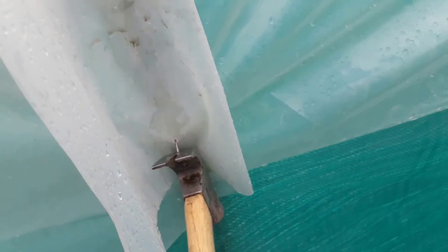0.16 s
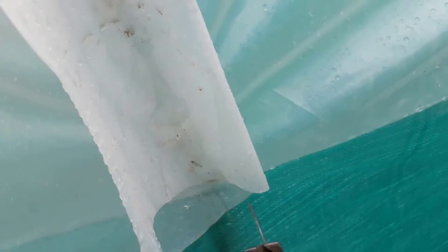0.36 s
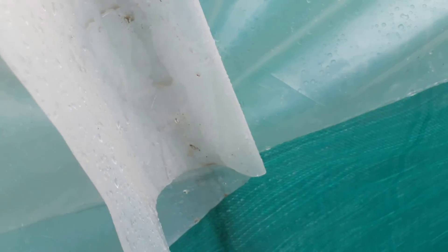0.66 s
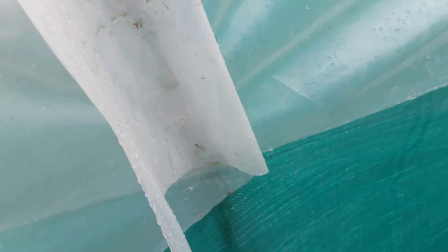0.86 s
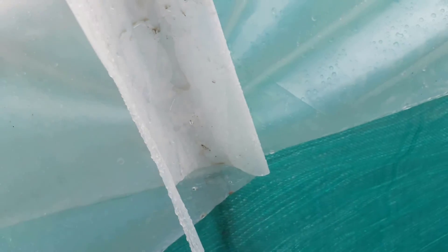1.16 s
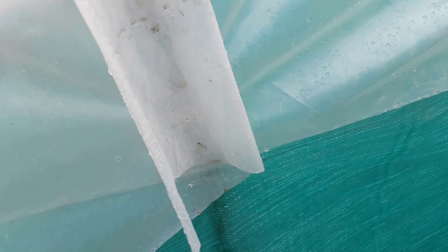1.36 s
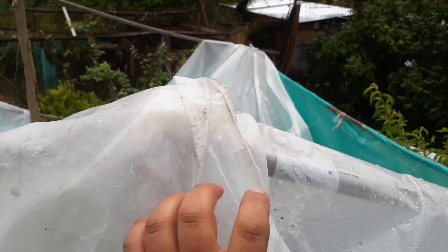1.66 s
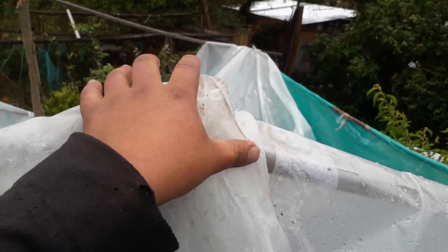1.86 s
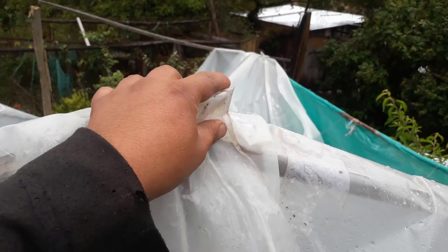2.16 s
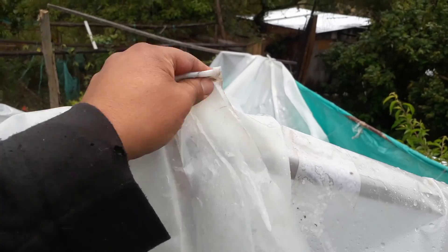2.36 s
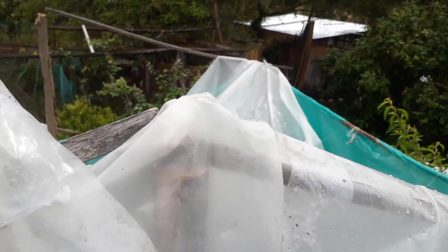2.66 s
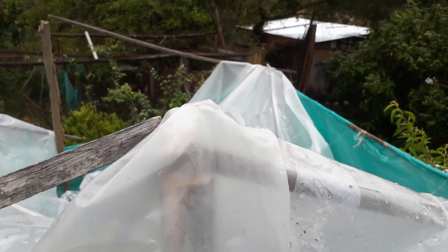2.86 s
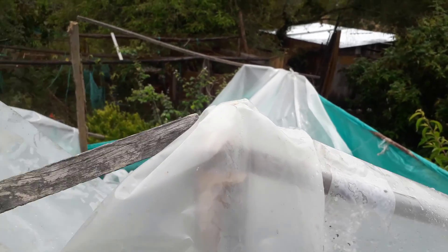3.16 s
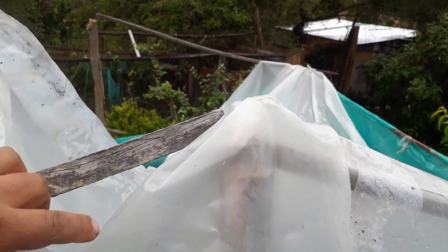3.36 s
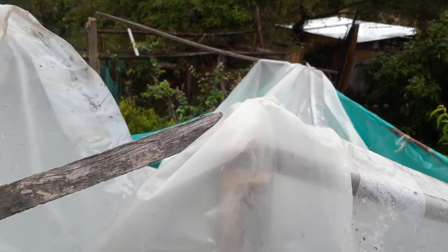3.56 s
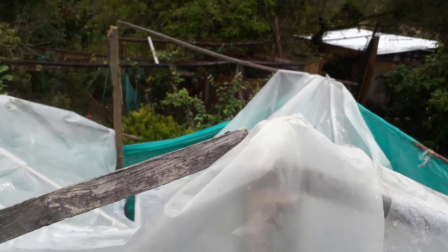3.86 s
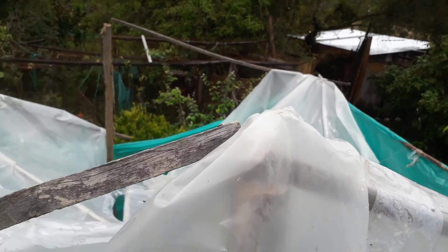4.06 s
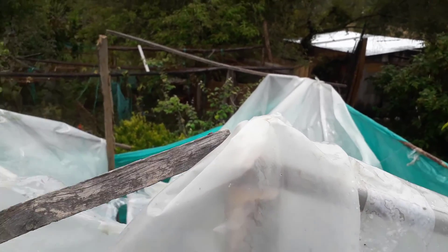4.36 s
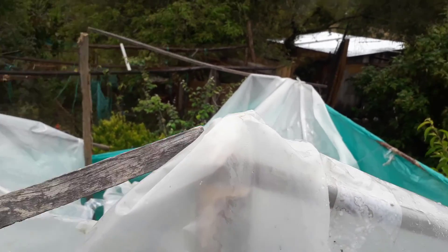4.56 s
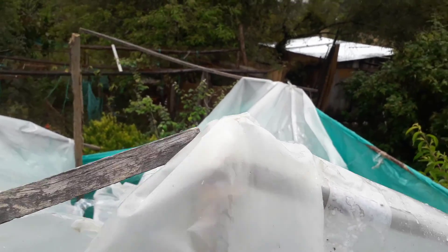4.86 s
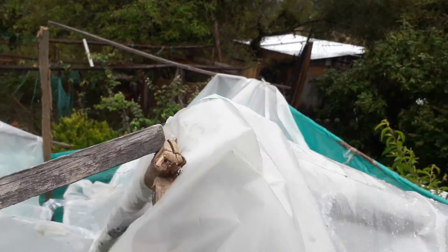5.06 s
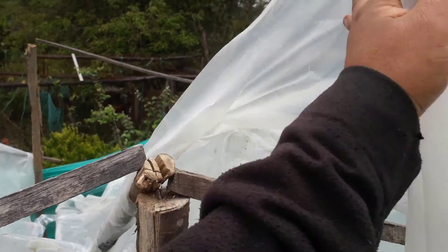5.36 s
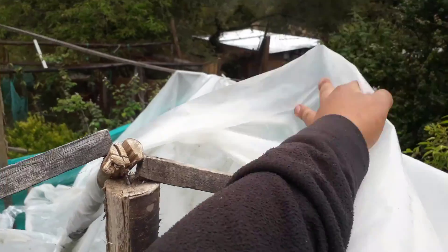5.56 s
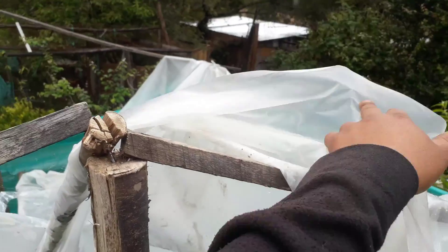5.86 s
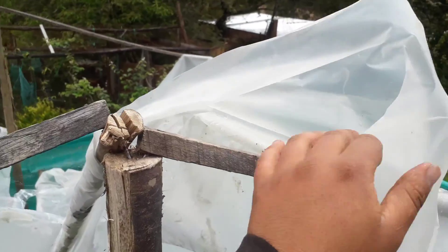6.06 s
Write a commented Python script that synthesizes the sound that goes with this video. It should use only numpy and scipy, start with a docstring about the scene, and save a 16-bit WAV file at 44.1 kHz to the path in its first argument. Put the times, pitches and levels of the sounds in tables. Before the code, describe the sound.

Close, dry crinkling and hard snapping of thin plastic film pulled by hand outdoors, after a brief rustle and a quiet pause with small birds.

```python
"""A soft rustle over a low distant hum and near birdsong, then plastic snaps hard as a hand pulls a sheet.
The thin film goes over a garden frame, close to a phone, in two shots split by a short near-silent gap.
Creases are bursts of film-coloured noise ringing a patch; crinkle, slide and flap are dense random crackle.
Birds are gliding sines, some smeared by a noise echo of the trees; the garden is filtered noise and faint tones.
"""
import sys
import numpy as np
from scipy import signal
from scipy.fft import rfft, irfft
from scipy.io import wavfile
from scipy.ndimage import uniform_filter1d

SR = 44100
rng = np.random.default_rng(int(sys.argv[2]) if len(sys.argv) > 2 else 0)


def to_wav(s):
    """Save 16-bit WAV."""
    ch = np.atleast_2d(s).T  # columns
    pcm = np.round(np.clip(ch, -1, 1) * 32767)  # PCM
    wavfile.write(sys.argv[1], SR, pcm.astype(np.int16))


N = 272979

# Loud creases snapping; fall is held to at least 0.2 ms:
# (time [s], ring peak [dB], ring pitch [Hz], fall [ms], crack peak [dB re ring peak])
SNAPS = [(.3071, -5.5, 1270, 0.27, -36), (.323, -6, 1270, 0.35, -7), (.3848, -20.5, 1550, 1.1, -23),
         (.4302, -23, 1500, .6, -24), (.4558, -26.5, 1440, 1.3, -6.5), (.6384, -33, 1250, 2.9, -23),
         (1.6335, -28, 5000, 2.4, 8.5), (1.6546, -4, 1730, 1.5, -6.5), (1.6731, -15, 4000, 0.73, -9),
         (1.681, -10, 1590, 2.4, -11), (1.6902, -15.5, 970, 2.3, -29), (1.959, -20, 920, 4.2, -22),
         (1.968, 0, 1820, 0.55, -13.5), (2.009, -25, 1640, 0.42, -30), (2.129, -1.5, 1156, .74, -9.5),
         (2.256, -19.5, 2190, 0.7, -19), (2.2827, -12, 2140, 0.7, -3.5), (2.33, -20.5, 1030, 1.3, -19),
         (2.646, -15.5, 2300, 1, -8), (2.709, -25, 1560, 4.1, -21), (2.7354, -15, 1240, 0.7, -25),
         (2.7577, -5, 1600, .48, -18), (2.7653, -6, 1660, 0.79, -23), (2.768, -11, 1480, 5.8, -11.5),
         (2.7857, -13, 1550, 8.1, -26), (2.8269, -6.5, 1660, 0.81, -10.5), (2.833, -7.5, 1580, 3, -12),
         (2.8414, -7.5, 1620, 1, -34), (2.883, -19, 1600, 3.5, -22), (2.891, -4.5, 1900, 0.98, -7.5),
         (2.9115, -10.5, 1820, 2.1, -16), (2.9199, -13, 1750, 0.8, -30), (2.9655, -17, 1730, 1.3, -8),
         (2.9837, -9, 1720, 0.27, -13), (3.059, -16.5, 1580, 1.2, -29), (3.1585, -14, 1790, 1, -20),
         (3.213, -15, 1670, 1.2, -9), (3.328, -19.5, 1830, 12, -13), (3.3467, -1, 1520, 1, -17),
         (3.3612, -2.5, 2570, 2.5, -8), (3.389, -4.5, 2240, 0.79, -6.5), (3.4534, -10, 1790, 1.1, 2.5),
         (3.553, -16, 1350, 1.1, -24), (3.5748, -6.5, 2450, 1.9, -8.5), (3.6217, -13, 1830, 0.85, -31),
         (3.6486, -6.5, 2050, 0.87, -22), (3.6927, -13.5, 1790, .91, -17), (3.7266, -12, 1830, 1.8, -18),
         (3.7323, -14.5, 1410, 4, -29), (3.7536, -14.5, 1550, 0.34, 2.5), (3.7888, -12, 796, 37, -12),
         (3.7947, -8.5, 1540, 8.2, -29), (3.821, -14, 1560, 11, -20), (3.8507, -13.5, 1740, .72, -13),
         (3.9186, -30, 1590, 1.4, -27), (3.932, -12.5, 2530, 2.1, -4.5), (3.959, -21, 1720, 4.1, -19),
         (3.9902, -7, 1010, 0.26, -23), (4.1329, -12, 1660, .43, -17), (4.208, -20, 1460, 4.1, -20),
         (4.2758, -20, 1580, 5, -25), (4.313, -25, 1920, .95, -28), (4.358, -9.5, 1640, 4, -34),
         (4.3957, -7, 1800, 1.1, -30), (4.403, -7, 825, 2.9, -0.5), (4.422, -4, 1760, 1.9, -16),
         (4.4496, -2.5, 2090, 0.17, -21), (4.479, -6, 1880, 0.6, -10), (4.486, -11, 1810, 10, -12.5),
         (4.5181, -12.5, 890, 12, -20), (4.5545, -15, 2680, 1.5, -23), (4.5881, -6, 1860, 1.9, -11.5),
         (4.7044, -24.5, 1600, 2.7, -34), (4.8487, -30, 1590, 1.3, -33), (4.885, -16.5, 1720, 4.1, -25),
         (4.9046, -10, 1870, 2, -21), (4.9158, -2, 1900, 0.45, -12.5), (4.973, -11.5, 2000, 1.2, -27),
         (4.9982, -18, 1450, .95, -31), (5.0097, -16.5, 1890, 4.3, -30), (5.0285, -13.5, 1530, 0.73, -27),
         (5.0488, -3, 1780, 0.38, -15.5), (5.062, -12.5, 2160, 1.6, -18), (5.1017, -17.5, 2020, 1.9, -26),
         (5.1315, -16.5, 1610, .82, -13), (5.1627, -3.5, 2140, 1.7, -8.5), (5.2084, -10.5, 2280, 0.92, -4),
         (5.238, -17.5, 2140, 2.7, -13), (5.2693, -4.5, 3620, 0.81, -5.5), (5.284, -14, 2310, 4.6, -3),
         (5.3451, -9.5, 1830, 3.1, -8), (5.3593, -14, 1060, 1.1, -25), (5.3783, -12, 3160, 1.2, -16),
         (5.4269, -15.5, 1960, 2.9, -5), (5.4889, -17.5, 810, 2.9, -1), (5.521, -16.5, 1730, 0.98, -3.5),
         (5.5742, -13, 1760, 4.8, -15), (5.6258, -13.5, 1230, 1.5, -20), (5.6728, -15.5, 2240, 1.7, -8.5),
         (5.7104, -16, 2250, 1.2, -9), (5.7389, -15.5, 1230, 3.7, -20), (5.7542, -13.5, 1940, 2.5, -7.5),
         (5.7671, -11.5, 2070, 0.57, -12.5), (5.8094, -19, 1400, 0.54, -16), (5.8509, -15, 1430, 2.2, 1.5),
         (5.9194, -24.5, 1360, 1.8, -31), (5.9633, -22.5, 1160, 0.98, -20), (6.0095, -20, 1090, 1.4, -23),
         (6.0147, -20.5, 1130, 2.8, -19), (6.0376, -13.5, 2940, 2.1, -11)]
# Tone of the film as the microphone colours it: (frequency [Hz], level per hertz [dB])
FILM_TONE = [(35, -54), (60, -18.5), (124, -8), (222, -2), (389, -1), (666, -7), (1700, -3), (2520, -5),
             (3270, -7), (4420, -4.5), (6900, -17.5), (9350, -43), (10800, -48.5), (13000, -38),
             (16000, -44.5)]
# Each pull of the hand, as breakpoints joined by straight lines in dB:
# (time [s], crinkle level [dB], slide level [dB], flap level [dB])
PULLS = [
    [(.02, -48, -48.5, -50), (.168, -88, -75, -45.5), (.227, -39, -49, -42), (.317, -58, -37.5, -33),
     (.383, -36, -37.5, -40), (.441, -64, -60, -58), (.499, -69, -71, -59)],
    [(1.63, -55, -42, -36.5), (1.684, -41.5, -40, -25.5), (1.716, -56, -51, -41), (1.824, -58, -55.5, -64),
     (1.96, -24.5, -34, -23), (1.99, -51, -51, -41), (2.033, -55, -54, -43)],
    [(2.065, -33.5, -43, -46), (2.1, -26, -34, -35), (2.129, -37, -38.5, -35), (2.165, -40, -46.5, -52),
     (2.292, -32, -34.5, -57), (2.359, -37.5, -47.5, -41.5), (2.46, -30, -29, -33.5),
     (2.536, -40, -35, -43.5), (2.654, -30, -38.5, -31.5), (2.738, -35, -42.5, -37),
     (2.832, -28.5, -36, -30), (2.897, -25.5, -37, -37), (2.955, -35, -43.5, -40),
     (3.091, -40.5, -57, -46.5)],
    [(3.16, -41.5, -43.5, -47.5), (3.207, -31.5, -37, -37), (3.308, -39.5, -42.5, -42.5),
     (3.36, -31.5, -38, -37.5), (3.554, -35.5, -45.5, -50), (3.753, -24.5, -33, -28),
     (3.849, -28.5, -42.5, -31.5), (3.981, -23.5, -41, -29.5), (4.024, -42.5, -52.5, -49)],
    [(4.2, -31, -48.5, -33.5), (4.236, -42.5, -53, -45.5), (4.384, -33.5, -54, -30.5),
     (4.484, -24, -37.5, -33.5), (4.588, -30.5, -39, -39), (4.655, -39, -50, -54), (4.707, -40, -67, -40),
     (4.85, -57, -57, -60.5)],
    [(4.915, -25, -43, -34.5), (4.991, -44, -48, -40), (5.059, -26, -52, -36), (5.15, -44.5, -48.5, -39),
     (5.256, -41, -59, -44), (5.285, -40, -39, -42), (5.322, -46, -59, -51), (5.35, -34.5, -53, -38),
     (5.406, -41, -46.5, -53)],
    [(5.432, -25.5, -33, -31), (5.511, -38, -47, -31.5), (5.581, -30, -33.5, -40), (5.641, -35.5, -47, -36),
     (5.677, -26.5, -31.5, -41), (5.805, -41.5, -53.5, -55), (5.861, -37, -46, -65), (5.992, -44, -46, -67),
     (6.046, -34, -60, -46.5), (6.072, -47, -51, -59), (6.12, -40.5, -57, -48), (6.18, -54, -68, -70)],
]
# Taut patches of film, each buckling on its own: (centre [Hz], level in the patch mix [dB])
PATCHES = [(900, -5), (1300, -2.8), (1900, 0.7), (2700, -4.5)]
# Slack film slapping: (time [s], peak [dB], pitch [Hz], time to fall 60 dB [s], held to 0.01-0.05 s)
THUMPS = [(0.133, -29.5, 332, 0.0081), (.308, -26, 170, .025), (0.322, -23.5, 167, 0.024),
          (1.963, -29, 110, 0.025), (2.128, -27, 216, 0.027), (4.4, -36, 110, 0.027),
          (5.187, -20, 270, 0.012), (5.518, -24, 304, 0.017)]
# One bird's rising whistle: (time [s], length [s], top pitch [Hz], level [dB])
RISERS = [(0.483, 0.1, 6300, -57), (0.853, 0.14, 5970, -57), (1.276, 0.13, 6250, -56.5)]
# Near birds' notes, most of them sagging: (time [s], length [s], from [Hz], to [Hz], level [dB])
SAGS = [(0.036, .14, 4120, 3550, -54), (.065, 0.095, 4410, 3050, -53), (0.512, .06, 3800, 3320, -63),
        (0.555, .14, 4200, 3350, -70), (0.792, 0.15, 4090, 3500, -57), (1.033, 0.12, 4520, 4520, -61),
        (1.052, 0.11, 4070, 3420, -57.5), (1.106, .05, 3950, 4220, -58), (1.184, 0.12, 3430, 3300, -58),
        (1.307, .1, 3690, 3420, -61), (1.345, 0.056, 4270, 3100, -58), (1.539, 0.063, 4500, 4300, -61)]
# A far bird's thin drop: (time [s], level [dB])
SEEPS = [(.703, -68.5), (1.112, -63.5)]
# Tone of the distant rumble, before it is levelled: (frequency [Hz], level per hertz [dB])
RUMBLE_TONE = [(18, -27), (30, -24), (100, -3), (252, -12), (295, -14.5), (461, -23), (780, -17.5),
               (1100, -25.5), (1860, -32), (2750, -33.5), (3980, -32.5), (6720, -45.5), (16000, -66)]
# Wavering hum tones: (time [s], length [s], pitch [Hz], mean level [dB])
HUM = [(0, 2.4, 97, -66), (.75, .5, 250, -54), (0.767, 0.23, 450, -59.5), (0.927, 0.86, 1400, -79)]

# Near-silence between the shots; the rustle rests from STILL_S to the end of the gap
GAP_START_S, GAP_END_S, STILL_S = 1.596, 1.629, 0.5

# Snaps: a crease that lets go slowly also tears loose slowly (rise before the peak, at most 3 ms)
RISE_MS, RISE_PER_FALL = 0.35, 0.22
THUD_DB, THUD_GROWTH = -25, 0.53  # under a full-scale snap; dB of thud per dB of snap
BITE_DB, BITE_GROWTH = -3.5, 0.74  # upper middle re the ring; rises by this share of the crack level

# Small creases at random: rate, middle of the pitch, fall and crack spreads
SMALL_PER_S, SMALL_HZ, SMALL_FALL_MS, SMALL_CRACK_DB = 45, 1630, 1.33, -20.5
SMALL_DB, SMALL_SPREAD_DB = 5, 9.5  # mean peak re the crinkle, and full width of the spread

HISS_DB, HISS_GROWTH = -13.5, 1.225  # the hiss follows the slide level, more steeply
RASP_START_S, RASP_END_S, RASP_HZ, RASP_DB = 0.24, 0.48, 1500, -43  # level before gating and flicker

# Birds; echo levels are re each dry note
RISER_HZ, RISER_CLIMB = 3060, 0.94  # starting pitch; share of the note spent climbing
SEEP_S, SEEP_FROM_HZ, SEEP_TO_HZ = 0.052, 7820, 6330
RISER_ECHO_DB, SAG_ECHO_DB, SEEP_ECHO_DB = 4.5, -5, 6
FADE_IN = 0.38  # upward glides swell as they climb (power of the elapsed share)
TREES_T60_S = 0.38

RUMBLE_DB, SECOND_SHOT_DB = -51.5, -8  # the rumble is fainter from the second spot
CEILING, TOP_HZ = 0.85, 15800  # the phone: rounded peaks approach this amplitude; top cut


def snaps():
    """Each crease tears loose within a few ms, rings its patch of film and shakes on in a faint noisy tail."""
    out = np.zeros(N)
    t_ms = np.arange(-400, 1800) * 1000 / SR
    film = response(FILM_TONE)
    s, db, hz, fall_ms, crack_db = np.concatenate([SNAPS, small_snaps()]).T[..., None]
    noise = rng.standard_normal((len(s), 2, len(t_ms)))
    fall_ms = np.maximum(fall_ms, 0.2)
    rise_ms = np.minimum(RISE_MS + RISE_PER_FALL * fall_ms, 3)
    push = np.exp(np.where(t_ms < 0, t_ms / rise_ms, -1.2 * t_ms / fall_ms))
    after = t_ms > 0

    shake = colour(noise[:, 0] * (push + 0.1 * after * np.exp(-t_ms / 9.6)), film)
    patch = np.array([band(x, f / 1.314, f * 1.234) for x, f in zip(shake, hz[:, 0])])
    ring = peak1(patch) + 1.42 * peak1(band(shake, 664, 3190))
    # The slack film heaves slowly
    heave = colour(noise[:, 1] * (push + 0.43 * after * np.exp(-t_ms / 7.7)), film)
    thud = band(heave, 123, 750)
    # The treble comes only at the sharpest moment
    sharp_push = push ** np.where(t_ms < 0, 4, 1.7)
    crack = band(colour(noise[:, 0] * sharp_push, film), 5700, 21700)
    bite = band(colour(noise[:, 1] * push ** 3.2, film), 3060, 6900)

    bite_db = BITE_DB + BITE_GROWTH * crack_db
    snap = peak1(ring) + undb(bite_db) * peak1(bite) + undb(crack_db) * peak1(crack)
    sound = undb(db) * snap + undb(THUD_DB + THUD_GROWTH * db) * peak1(thud)
    for start, x in zip(s[:, 0], sound):
        add(out, start + t_ms[0] / 1000, x)
    return out


def small_snaps():
    """Rows like SNAPS for little creases that give way at random, their level following the pull."""
    s, size, pitch, fall, edge = rng.random((int(SMALL_PER_S * N / SR), 5)).T
    s = 0.05 + s * (N / SR - 0.1)
    resting = (s > STILL_S) & (s < GAP_END_S)
    db = pull_db(s)[0] + SMALL_DB + SMALL_SPREAD_DB * (size - 0.5) - 80 * resting
    hz = SMALL_HZ * 2 ** (pitch - 0.5)
    fall_ms = SMALL_FALL_MS * 4 ** (fall - 0.5)
    crack_db = SMALL_CRACK_DB + 20 * (edge - 0.5)
    return np.transpose([s, db, hz, fall_ms, crack_db])


def rustle():
    """Crinkling buckles in the middle, slack flapping below, fingers and film sliding above."""
    t = np.arange(N) / SR
    moving = (t < STILL_S) | (t > GAP_END_S)
    crinkle_db, slide_db, flap_db = pull_db(t)
    hiss_db = HISS_DB + HISS_GROWTH * slide_db
    coarse = crackle(700, 1.85, 0.015)
    fine = crackle(2500, 2.0, 0.016)
    surge = walk(60)  # shared by all four layers
    smooth = coarse + 0.91 * fine

    patches = 0
    for hz, db in PATCHES:
        patches = patches + level(band(crackle(220, 4.23, 0.017), hz / 1.15, hz * 1.215), db)
    buckles = level(band(coarse, 575, 2600), 0.1) + 0.66 * patches
    crinkle = level(buckles, -0.72) * undb(crinkle_db + 0.61 * surge)
    slack = band(crackle(300, 2.6, 0.026), 76, 735)
    flap = level(slack, -0.67) * undb(flap_db + 0.32 * surge)
    slide = level(band(smooth, 1870, 12000), 0.17) * undb(slide_db + 0.52 * surge)
    top = band(band(smooth, 12800, 18000), 12800, 18000)
    hiss = level(top, 1.1) * undb(hiss_db + 0.9 * surge)
    return moving * (crinkle + flap + slide + hiss)


def pull_db(t):
    """Levels of crinkle, slide and flapping at times t, as the hand pulls."""
    s, *columns = np.concatenate(PULLS).T
    return [np.interp(t, s, c) for c in columns]


def crackle(rate, scatter_db, tail_s):
    """Tiny buckles at random moments, a few far larger, each shaking the film for a moment."""
    pops = (rng.random(N) < rate / SR) * undb(scatter_db * rng.exponential(size=N))
    # The tail falls 60 dB in tail_s
    shake = signal.lfilter([1], [1, -np.exp(-np.log(1000) / (tail_s * SR))], pops)
    return colour(shake * rng.standard_normal(N), response(FILM_TONE))


def rasp():
    """Dense stick-slip ticks ring one taut patch while a hammer claw drags over the film."""
    t = np.arange(N) / SR
    u = np.clip((t - RASP_START_S) / (RASP_END_S - RASP_START_S), 0, 1)
    lo_hz, hi_hz = RASP_HZ / 1.2, RASP_HZ * 1.17
    ticks = band(band(crackle(450, 4.3, 0.0038), lo_hz, hi_hz), lo_hz, hi_hz)
    drag = np.abs(np.sin(np.pi * u)) ** 0.4 * (u < 1)
    return level(ticks, RASP_DB) * drag * undb(4.3 * walk(35.4))


def thumps():
    """A loose fold slaps once: a low sine that blooms and dies away quickly."""
    out = np.zeros(N)
    t = np.arange(3000) / SR
    for s, db, hz, t60_s in THUMPS:
        envelope = t * np.exp(-np.log(1000) * t / np.clip(t60_s, 0.01, 0.05))
        add(out, s, undb(db) * peak1(np.sin(2 * np.pi * hz * t) * envelope))
    return out


def birds():
    """Gliding whistles; the farther the bird, the more the echo of the trees smears it."""
    near, far = np.zeros(N), np.zeros(N)
    warble = 1 + 0.01 * walk(200)
    notes = [(s, length, RISER_HZ, top_hz, db, RISER_ECHO_DB, RISER_CLIMB)
             for s, length, top_hz, db in RISERS]
    notes += [(*row, SAG_ECHO_DB, 1) for row in SAGS]
    notes += [(s, SEEP_S, SEEP_FROM_HZ, SEEP_TO_HZ, db, SEEP_ECHO_DB, 1) for s, db in SEEPS]
    for s, length, from_hz, to_hz, db, echo_db, glide in notes:
        u = np.linspace(0, 1, int(length * SR))
        pitch = from_hz + (to_hz - from_hz) * np.minimum(u / glide, 1)
        pitch = pitch * warble[int(s * SR):][:len(u)]
        envelope = np.sin(np.pi * u) ** 0.26 * u ** (FADE_IN * (to_hz > from_hz))
        note = undb(db) * envelope * np.sin(2 * np.pi * np.cumsum(pitch) / SR)
        add(near, s, note)
        add(far, s, undb(echo_db) * note)
    t = np.arange(SR // 2) / SR
    echo = rng.standard_normal(len(t)) * np.exp(-np.log(1000) * t / TREES_T60_S)
    echo = echo / np.sqrt(np.sum(echo ** 2))
    return near * undb(2.3 * walk(83)) + signal.fftconvolve(far, echo)[:N]


def garden():
    """Distant rumble in overlapping bands that swell together and flicker alone, with a few wavering tones."""
    air = colour(rng.standard_normal(N), response(RUMBLE_TONE, size=4096))
    swell = walk(1.0)
    out = 0
    for hz in 30 * 2 ** np.arange(0, 9, 0.5):  # half-octave steps
        out = out + undb(1.0 * swell + 1.1 * walk(8)) * band(air, hz / 1.09, hz * 1.54)
    second_shot = np.arange(N) > GAP_END_S * SR
    out = level(out, RUMBLE_DB) * undb(SECOND_SHOT_DB * second_shot)
    for s, length, hz, db in HUM:
        n = int(length * SR)
        pitch = hz * (1 + 0.0055 * walk(10)[:n])
        loudness = undb(db + 3.9 * walk(10)[:n]) * np.hanning(n) ** 0.21
        add(out, s, loudness * np.sin(2 * np.pi * np.cumsum(pitch) / SR))
    return out


def undb(db):
    """Decibels to amplitude."""
    return 10 ** (np.asarray(db) / 20)


def level(x, db):
    """Set the RMS level in dB."""
    return x * undb(db) / np.sqrt(np.mean(x ** 2))


def peak1(x):
    """Bring each sound to a peak of 1."""
    return x / np.max(np.abs(x), axis=-1, keepdims=True)


def band(x, lo_hz, hi_hz):
    """Keep one band of frequencies."""
    return signal.sosfilt(signal.butter(2, [lo_hz, hi_hz], "bandpass", fs=SR, output="sos"), x)


def response(points, size=2048):
    """Causal impulse response with the gain of the (frequency [Hz], level [dB]) points, from the cepstrum."""
    hz, db = np.transpose(points)
    bin_hz = np.arange(size // 2 + 1) * SR / size
    log_gain = np.interp(np.log(bin_hz + 1), np.log(hz), db) * np.log(10) / 20
    c = irfft(log_gain)
    # Fold the cepstrum forward in time: minimum phase
    c[1:size // 2] *= 2
    c[size // 2 + 1:] = 0
    return irfft(np.exp(rfft(c)))


def colour(x, h):
    """Filter each row of x with impulse response h, keeping its length."""
    return signal.fftconvolve(np.atleast_2d(x), h[None], axes=1)[:, :x.shape[-1]].reshape(x.shape)


def walk(rate):
    """Random levels held 1 / rate s and slewed twice; spread near 1."""
    k = int(SR / rate)
    steps = np.repeat(rng.standard_normal(N // k + 1), k)
    return 1.38 * uniform_filter1d(uniform_filter1d(steps, k), k)[:N]


def add(out, s, x):
    """Mix x into out from s seconds on."""
    i = int(s * SR)
    out[i:i + len(x)] += x[:len(out) - i]


def scene():
    """Film, birds and garden mixed to one channel."""
    return (snaps() + thumps() + rustle() + rasp() + birds() + garden())[None]


def record(dry):
    """The edit dips to near-silence between the shots; the phone rounds the loudest peaks and cuts the top."""
    t = np.arange(N) / SR
    outside_gap_s = np.maximum(GAP_START_S - t, t - GAP_END_S)
    joined = dry * np.clip(outside_gap_s / 0.002, 0.02, 1)
    rounded = joined / (1 + (joined / CEILING) ** 4) ** 0.25
    return signal.sosfilt(signal.ellip(8, 0.2, 60, TOP_HZ, fs=SR, output="sos"), rounded)


dry = scene()
out = record(dry)
to_wav(out)
```